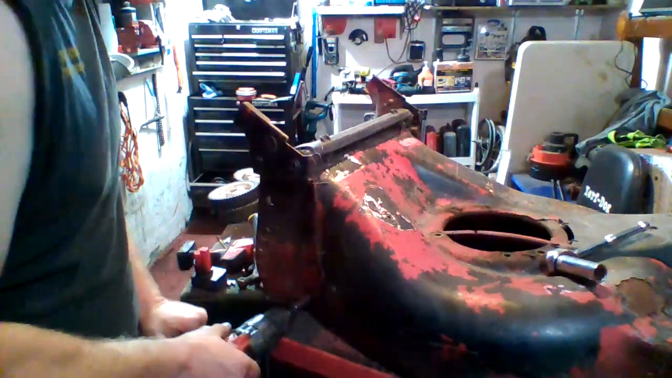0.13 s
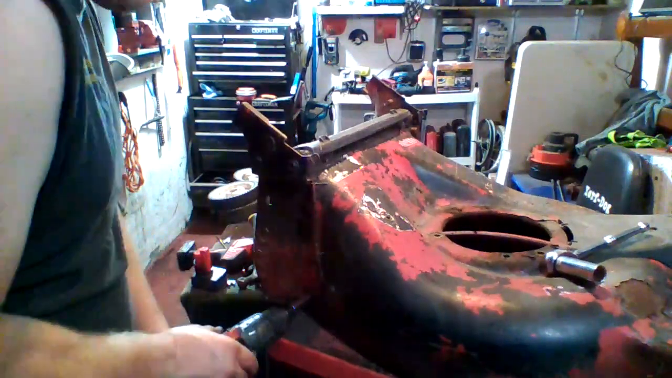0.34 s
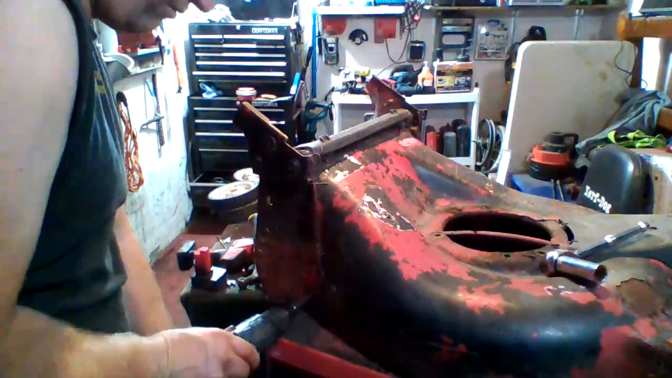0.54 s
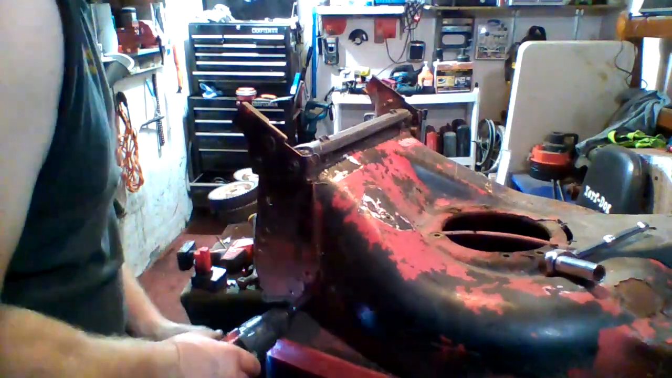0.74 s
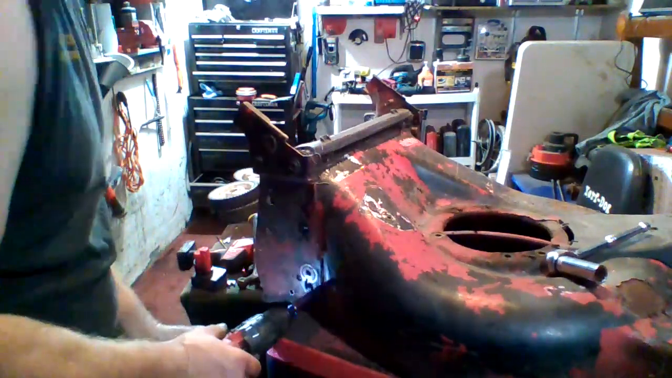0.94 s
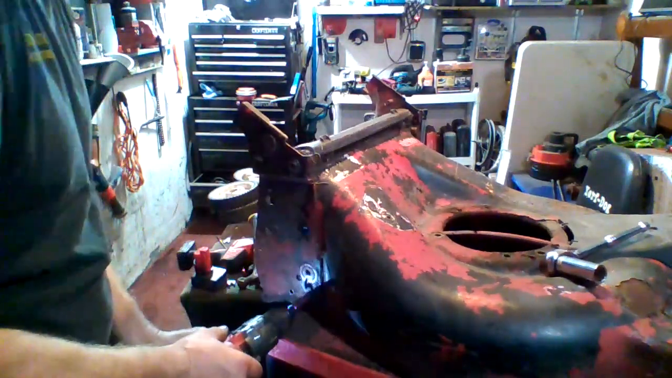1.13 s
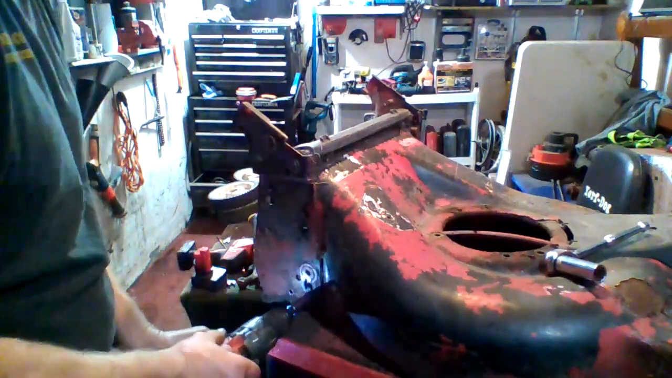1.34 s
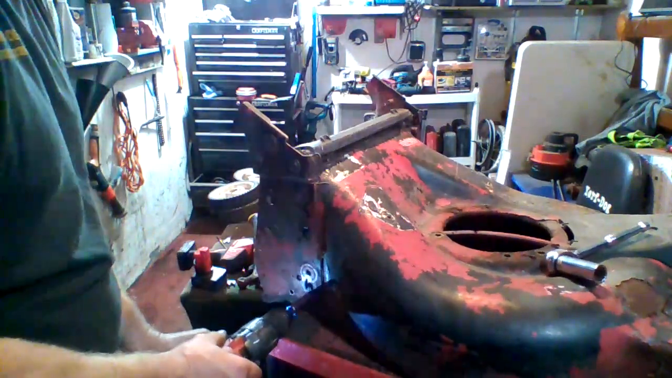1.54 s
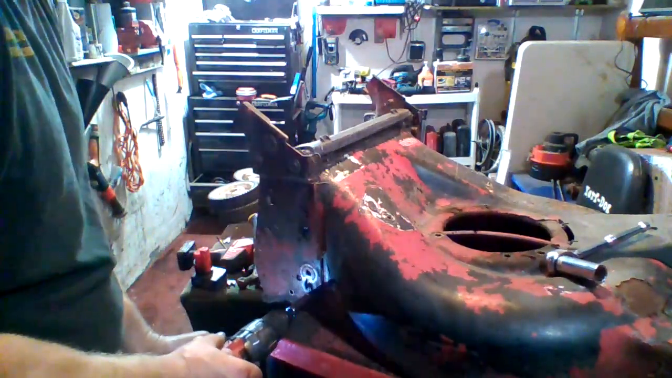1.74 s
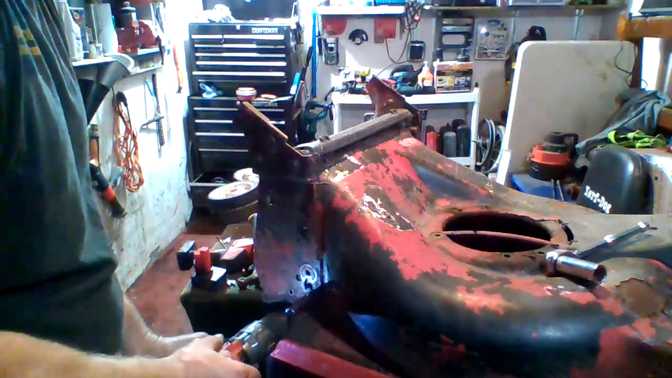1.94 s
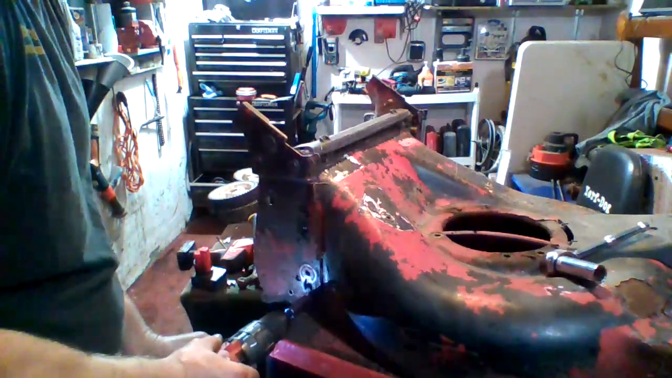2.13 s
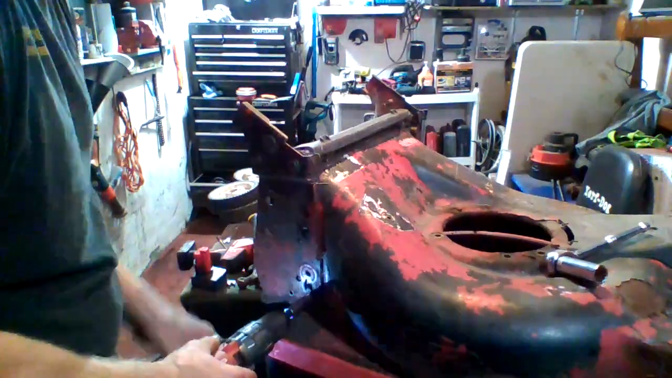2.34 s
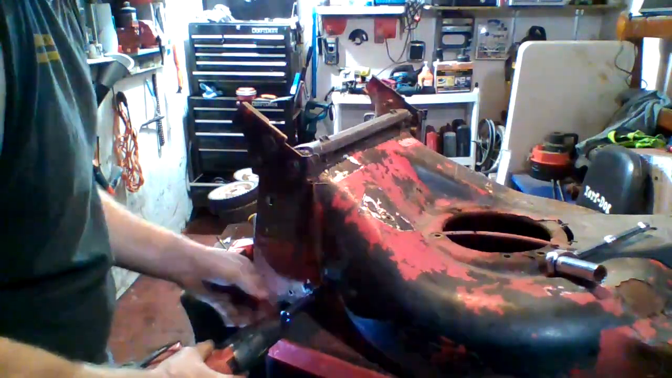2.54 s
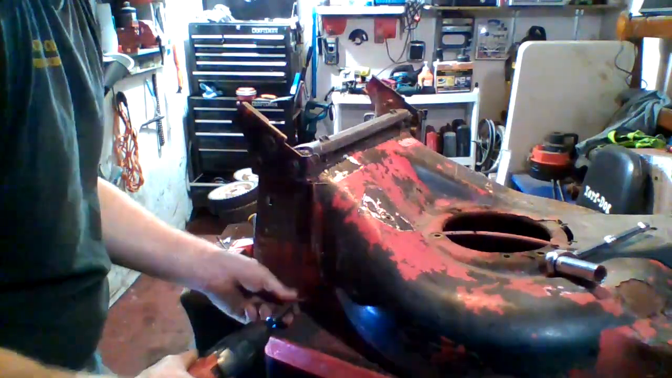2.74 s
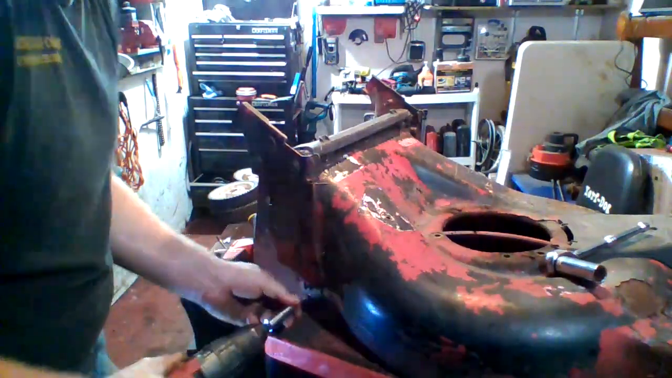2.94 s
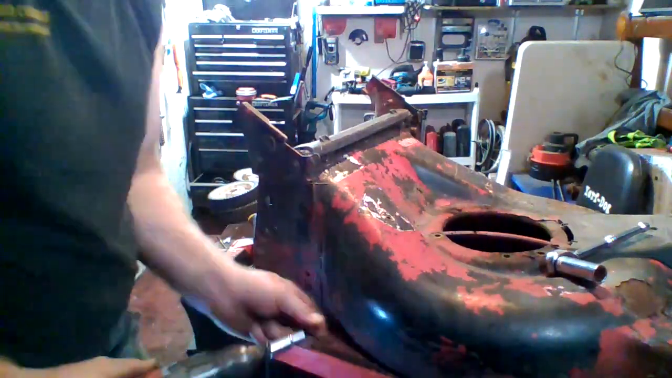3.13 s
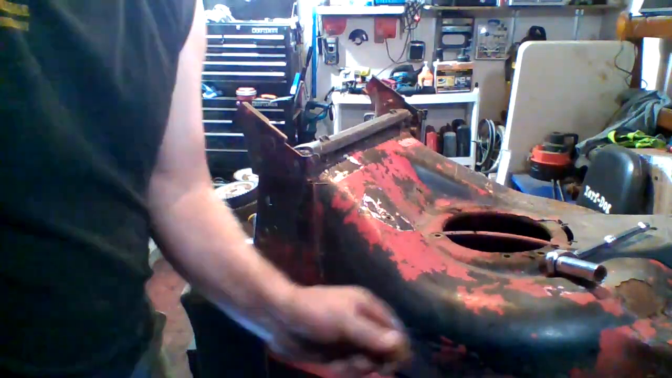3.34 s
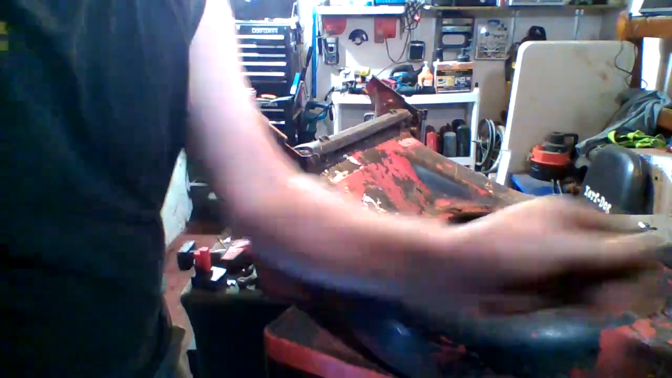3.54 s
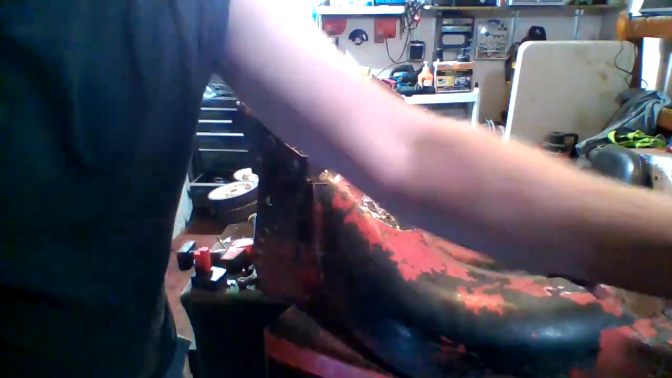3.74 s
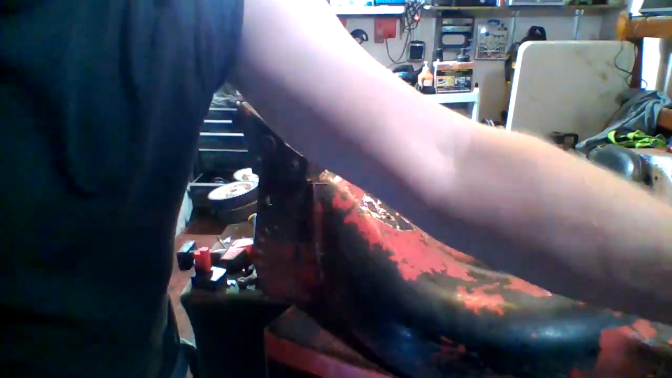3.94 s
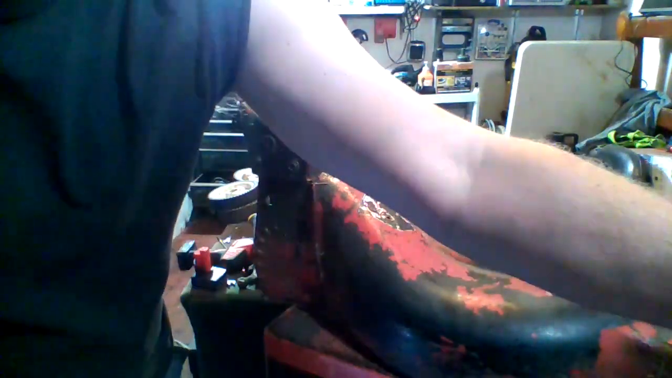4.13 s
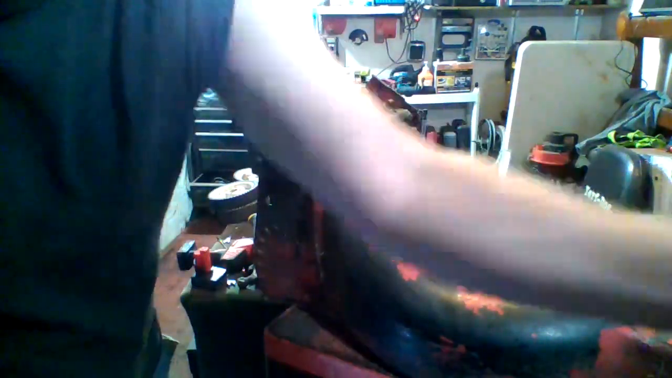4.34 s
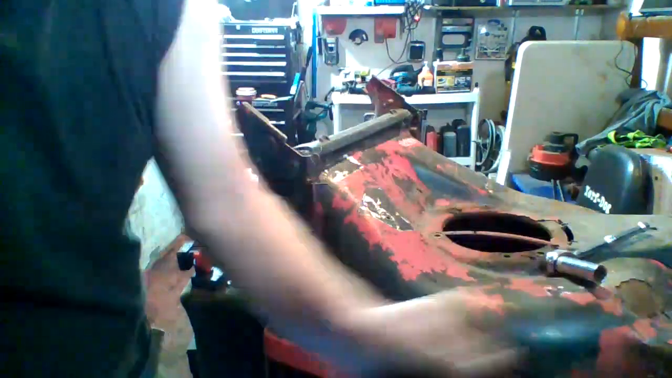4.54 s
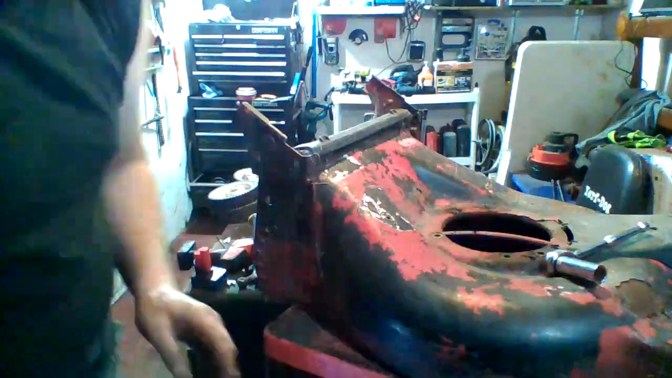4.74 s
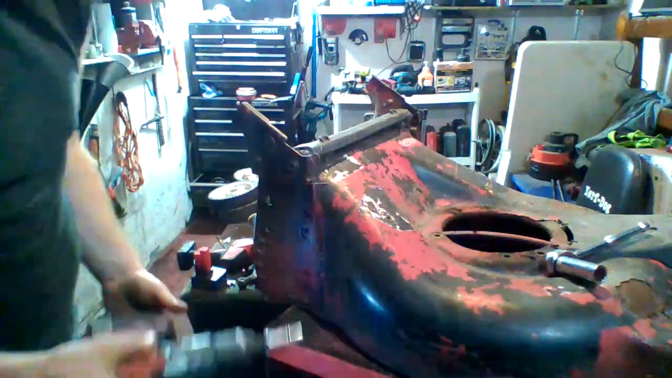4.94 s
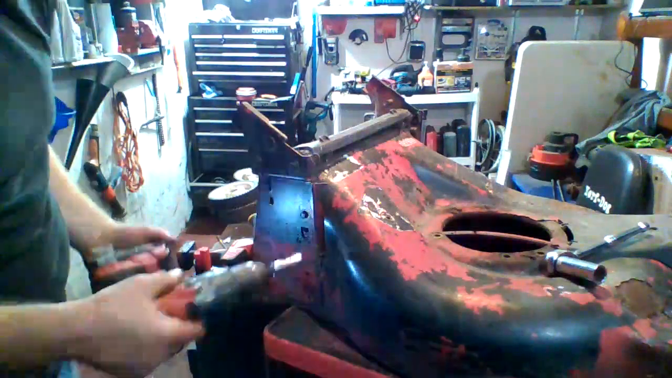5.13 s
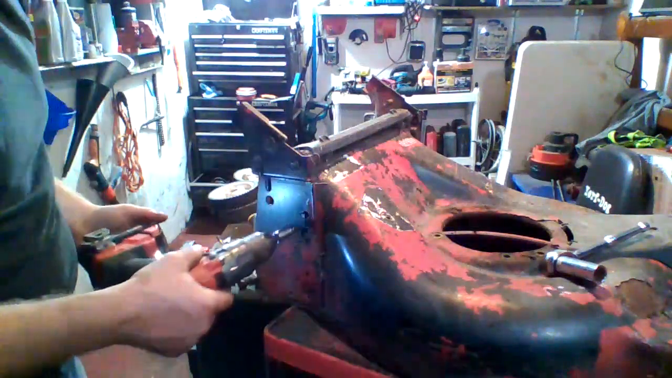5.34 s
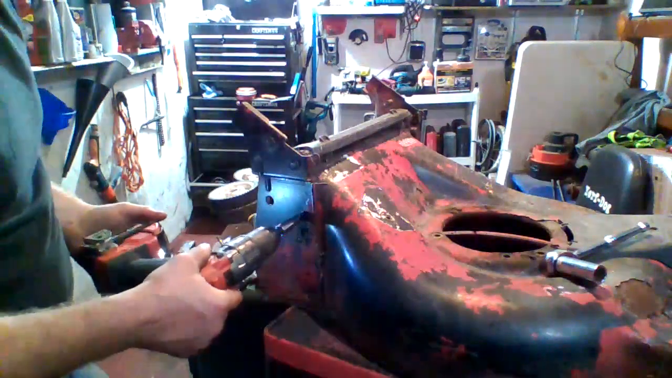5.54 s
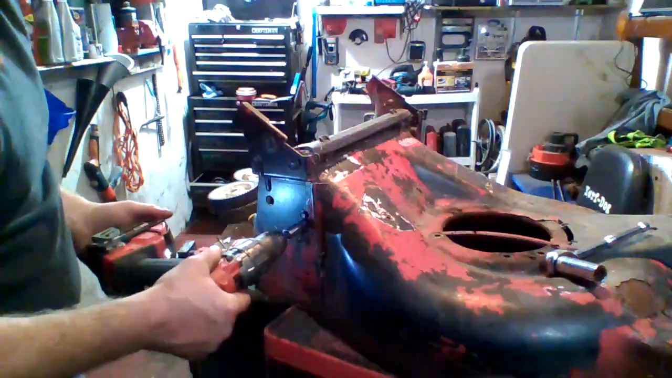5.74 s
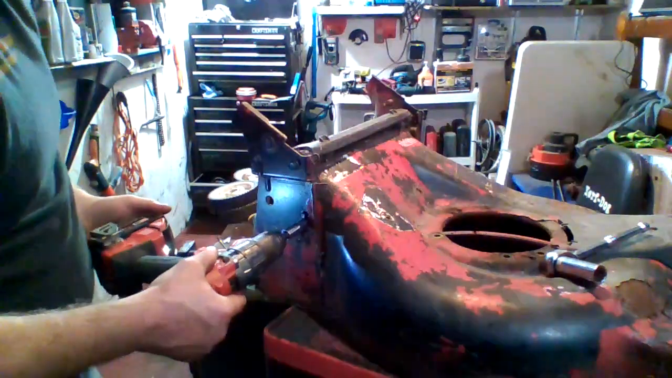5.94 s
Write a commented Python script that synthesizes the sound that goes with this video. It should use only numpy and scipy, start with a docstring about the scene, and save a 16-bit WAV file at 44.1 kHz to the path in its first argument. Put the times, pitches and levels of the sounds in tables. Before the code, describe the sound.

A nearby stereo microphone hears loose metal clicking, growing sharp, before a power driver bangs into load and whines loudly against a drumming steel deck for just over a second. The pitch leaps up, creeps higher, then plunges as the motor stops. Small taps and hand rustles follow, a bolt lands and bounces in a tray, and light handling closes with a muted knock. Short garage echoes, faint hiss and hum.

```python
"""A small garage: a cordless impact driver spins one bolt out of a steel deck near a two-port microphone.
The whine is a sum of sines at multiples of the shaft rate; gear grind and fan hiss are coloured noise, and
the deck drums in its low modes. Knocks, socket clinks and a bolt dropping into a tray are decaying modes
and noise bursts. Hands and cloth rustle in noise swells, something slides on the bench in resonant noise,
over rumble, hiss and faint tones; the tones, knocks and bench sounds leave echoes."""
import sys
import numpy as np
from scipy import signal
from scipy.fft import rfft, irfft, next_fast_len
from scipy.io import wavfile
from scipy.ndimage import uniform_filter1d

SR = 44100
rng = np.random.default_rng(int(sys.argv[2]) if len(sys.argv) > 2 else 0)


def wav_record(signal):
    """Record a signal, one row per channel, as 16-bit PCM in the file named by sys.argv[1]."""
    frames = np.transpose(np.atleast_2d(signal))
    bounded = np.clip(frames, -1, 1)
    # unit amplitude maps onto the largest positive 16-bit level
    quanta = np.round(bounded * 32767).astype(np.int16)
    wavfile.write(sys.argv[1], SR, quanta)


def decibels_to_gain(level_db):
    """Convert a level in decibels to a linear amplitude gain (20 dB per decade)."""
    exponent = np.asarray(level_db, float) / 20
    return 10 ** exponent


N = 268569
TIME = np.arange(N) / SR

# motor speed: spin-up, slow gain as the bolt frees, braking: (time [s], shaft rate [turns/s])
SHAFT_SPEED = [(1.305, 267.4), (1.33, 301.3), (1.351, 366), (1.37, 404), (1.4, 428.9), (1.44, 445.1),
               (1.555, 449.3), (1.69, 463.4), (1.8, 468.9), (1.9, 470.9), (2.1, 473), (2.345, 472.4),
               (2.375, 460.5), (2.395, 439), (2.425, 347), (2.455, 249.5)]
# strong shaft orders: (order [per turn], level at full speed [dB],
# loss per octave of speed below it [dB], change once braking [dB])
STRONG_ORDERS = [(4, -20.5, 30, 5.5), (8, -13.5, 15.5, -12), (13, -21, 37, 2), (26, -31, 13.5, 5)]
# weak steady shaft orders: (order [per turn], level at full speed [dB])
WEAK_ORDERS = [(1, -35), (32, -36)]
# pitches at which the whine arrives weakly or rings in the case, whichever order passes them:
# (frequency [Hz], half width [Hz], change [dB])
WHINE_SPOTS = [(1703, 90, -6), (1837, 21, -15), (2880, 110, 9), (3695.7, 20, -18), (5850, 45, -13),
               (6096, 17.1, -15.5)]
RELEASE_S, BRAKE_S = 2.35, 0.023  # trigger let go; time constant of the brake
WAVER, RAGGED = 0.04, 0.45  # rms phase waver of an order [rad]: always, and added away from full speed
MESH_ORDER, MESH_DB = 10.21, -37  # gear mesh [per turn] and its level at full speed without load
# speed control whistles while the trigger is half pulled, in two tones that part by PART_HZ each
WHISTLE_S, WHISTLE_END_S, WHISTLE_HZ, PART_HZ, WHISTLE_DB = 1.257, 1.3, 8150, 700, -38
# faint very high squeaks: (start [s], end [s], first pitch [Hz], last pitch [Hz], level [dB])
HIGH_SQUEAKS = [(5.345, 5.405, 13100, 13900, -56), (5.468, 5.53, 13750, 12500, -60),
                (5.91, 5.98, 15000, 13200, -62)]

# the run's noise: pull, full power, trigger release, rotor stopping, quiet
PULL_S, FULL_S, STOP_S, QUIET_S = 1.243, 1.316, 2.455, 2.539
# gear grind at those five moments, before its flicker: (level [dB], ...)
GRIND_LEVELS = -50, -20, -21, -22, -52
# fan hiss at those five moments, before its beat and flicker: (level [dB], ...)
FAN_LEVELS = -50, -14.5, -18.5, -19, -59.5
# colour of the gear grind: (frequency [Hz], relative density [dB per Hz])
GRIND_COLOUR = [(210, -53), (350, -22), (1690, -17), (1850, -20), (3430, -16), (4000, -15), (7500, -21),
                (9750, -57), (16500, -120)]
# colour of the fan hiss: (frequency [Hz], relative density [dB per Hz])
FAN_COLOUR = [(3820, -29), (6500, -7.5), (8600, -5.5), (9320, -7), (10100, -7.5), (13300, 1), (15500, -4.5)]
# colour of slack gears in their case: (frequency [Hz], relative density [dB per Hz])
CASE_COLOUR = [(1500, -26.5), (2200, 1.5), (2900, 0), (3900, 4), (4600, -18)]
# slack gears clatter as the motor takes up load
SLACK_S, SLACK_DB, SLACK_RISE_S, SLACK_FALL_S = 1.31, -20, 0.042, 0.05

# modes of the struck steel deck: (frequency [Hz], level [dB], decay time t60 [s])
DECK_MODES = [(205, -7, .12), (277, 0., .14), (325, -11, .09), (620, -9, .04), (1100, -7, .03),
              (1700, -9, .02), (2240, -6, .022)]
# drumming of the deck during the run: (time [s], level [dB])
DRUM_LEVEL = [(1.235, -64), (1.315, -23.5), (1.37, -33), (1.5, -37), (2.05, -31.5), (2.35, -34),
              (2.5, -42.5), (2.67, -61.5)]
STAND_DB = -22.5  # the stand under the deck, relative to the gear grind level
# blows on the deck: (time [s], peak level of the ringing [dB], hardness [dB per octave])
DECK_BLOWS = [(0.305, -16, 7.5), (0.535, -40, 4), (0.948, -40.5, -3.5), (1.205, -57, 17),
              (1.285, -13.5, -5.), (1.305, -12.5, -1), (5.15, -44.5, 7.5), (5.756, -27.5, -5),
              (5.8, -34, -7.5), (5.904, -41, -7)]
# rumble of the whole deck: (frequency [Hz], relative density [dB per Hz])
RUMBLE_COLOUR = [(130, -32), (260, 9.5), (420, -8), (800, -38)]
# wideband burst of a blow: (frequency [Hz], relative density [dB per Hz])
BLOW_COLOUR = [(300, -16.5), (2500, -3.0), (7000, -7.0), (15700, -8.5)]
# clinks of the loose socket on its shank: (time [s], level [dB])
SOCKET_CLINKS = [(.14, -32), (0.41, -25), (0.481, -21), (0.558, -27.5), (0.589, -10), (.626, -1),
                 (1.305, 12)]
# colour of a metal clink: (frequency [Hz], relative density [dB per Hz])
CLINK_COLOUR = [(1500, -40), (2900, -25), (3500, -11.5), (8500, -13.5), (11400, -11.5), (14000, -6),
                (15600, -7.5)]
# short pitched taps, the last three forming the body of a dull thud: (time [s], level [dB], pitch [Hz])
PITCHED_TAPS = [(2.747, -41.5, 1370), (2.805, -35.5, 1810), (2.817, -45, 1800), (3.401, -35, 1251),
                (5.079, -37.5, 1880), (5.744, -28, 1410), (5.754, -25.5, 624), (5.771, -25.5, 780)]
TAP_T60_S, TAP_WIDTH_HZ = 0.048, 380

# a bolt lands and bounces in a tray:
# (time [s], peak level of the clunk [dB], hardness [dB per octave], treble snap against the clunk [dB])
BOLT_DROPS = [(4.028, -13, -7, -9.5), (4.042, -26.5, -11, -9), (4.11, -41, -4, -13),
              (4.225, -13.5, -10.5, -16.5), (4.24, -28.5, -7, -21.5), (4.268, -35, -1.5, -23),
              (4.29, -20, -6, -34)]
# modes of the tray: (frequency [Hz], level [dB], decay time t60 [s])
TRAY_MODES = [(330, -17, .035), (450, -9, .03), (565, 0., .028), (660, -8, .025), (1090, -6, .025),
              (1350, -8, .025), (1700, -9, .028), (2230, -15, .022)]
# thin rattling panels of the tray, with a flatter colour than its modes:
# (frequency [Hz], relative density [dB per Hz])
PANEL_COLOUR = [(170, -24.5)] + [(hz, db / 2) for hz, db, _ in TRAY_MODES] + [(5000, -30.0)]
SPOT_SHIFT = 0.023  # standard deviation of the mode shift with landing spot, as a share of frequency

# faint bands of something sliding on the bench: (frequency [Hz], level [dB])
SLIDE_BANDS = [(1090, -68), (2250, -70), (3050, -74)]
SLIDE_S, SLIDE_END_S, SLIDE_WIDTH_HZ = 3.3, 4.02, 65
# hands and cloth brushing past:
# (middle [s], half length [s], rub level before its grain [dB], fine hiss level [dB])
RUSTLE_STROKES = [(0.357, 0.038, -53.5, -39.5), (0.673, 0.018, -48, -69), (0.949, 0.035, -58.5, -49.5),
                  (2.955, 0.074, -62.5, -54), (3.028, 0.042, -49, -45.5), (3.403, 0.022, -54, -55),
                  (4.663, 0.021, -54.5, -38.5), (4.731, 0.019, -70.5, -45), (5.211, 0.023, -49.5, -80.5),
                  (5.56, 0.034, -53, -49), (5.778, 0.028, -45.5, -41.5)]
# colour of the rub: (frequency [Hz], relative density [dB per Hz])
RUB_COLOUR = [(250, -10), (640, 0.5), (2300, -2), (4000, -4.5), (8000, -15.5), (12000, -36.5)]
# colour of the fine hiss: (frequency [Hz], relative density [dB per Hz])
FINE_COLOUR = [(3000, -24), (6000, -12), (11500, -7), (12800, 0.), (15600, -1.5)]

# colour of the room air: (frequency [Hz], relative density [dB per Hz])
AIR_COLOUR = [(18, 1.5), (61, -8.5), (145, -25), (330, -20.5), (560, -29.5), (1200, -32), (2200, -33),
              (5000, -37), (11500, -37), (13000, -28), (15600, -31)]
AIR_DB = -48.5
# wavering room tones: (frequency [Hz], level [dB])
ROOM_HUM = [(118, -66.5), (414, -69.5), (829, -72.5)]
# left-right likeness of the run noise, rub and echoes: (frequency [Hz], correlation [1])
NEAR_LIKENESS = [(300, 1), (1500, 0.82), (3100, 0.99), (6800, 0.17), (15000, 0.56)]
# left-right likeness set for the background and fine hiss; the top treble is nearly mono:
# (frequency [Hz], correlation [1])
BACKGROUND_LIKENESS = [(300, 0.96), (3100, 0.38), (15000, .94)]
# phase by which the left port leads: (frequency [Hz], lead [rad])
PORT_LEAD = [(600, 0.025), (2700, 0.73), (3880, 1.59), (5200, 1.293), (7000, 0.58), (13000, 0.27)]
# left port minus right port: (frequency [Hz], level difference [dB])
PORT_TILT = [(700, 0), (3770, 1), (15000, 2.5)]
# reverberation of the garage: (frequency [Hz], decay time t60 [s])
GARAGE_DECAY = [(150, .25), (700, .11), (4000, .14), (15000, .12)]


def evened(x):
    """Normalisation: scales to rms 1."""
    return x / np.sqrt(np.mean(x ** 2) + 1e-20)


def read(points, hz):
    """Interpolation of a spectrum table on a log-frequency axis."""
    f, value = np.transpose(points)
    return np.interp(np.log(hz + 1), np.log(f + 1), value)


def curves(rows):
    """Linear interpolation of table columns in time, with a gate open while the table lasts."""
    s, *columns = np.transpose(rows)
    gate = np.interp(TIME, [s[0] - .01, s[0], s[-1], s[-1] + .01], [0, 1, 1, 0])
    return gate, *(np.interp(TIME, s, c) for c in columns)


def drift(size, passes=1):
    """Random fluctuation: white noise low-passed by moving averages, rms 1."""
    x = rng.standard_normal(N)
    for _ in range(passes):
        x = uniform_filter1d(x, size=size)
    return evened(x)


def add(mix, s, sound):
    """Superposition: adds a sound to the mix at time s."""
    part = mix[round(s * SR):][:len(sound)]
    part += sound[:len(part)]


def ports(hz):
    """Stereo cues: phase and level difference between the two microphone ports."""
    half = decibels_to_gain(read(PORT_TILT, hz) / 2) * np.exp(.5j * read(PORT_LEAD, hz))
    return np.array([half, 1 / half])


def noise(colour, likeness, patchy_db):
    """Partially coherent stereo noise, shaped in frequency with drifting patches, rms 1."""
    frames, hz = N // 256 + 5, np.fft.rfftfreq(1024, 1 / SR)
    a, b, c, d, patches = rng.standard_normal((frames, 513, 5)).T
    patches = uniform_filter1d(patches, size=12, axis=0)
    patches = evened(uniform_filter1d(patches, size=8, axis=1))
    same = np.clip(read(likeness, hz), -1, 1)[:, None]
    left = a + 1j * b
    right = same * left + np.sqrt(1 - same ** 2) * (c + 1j * d)
    z = np.array([left, right]) * ports(hz)[:, :, None]
    z *= decibels_to_gain(read(colour, hz)[:, None] + patchy_db * patches)
    return evened(signal.istft(z, nperseg=1024, noverlap=768)[1][:, :N])


def resonate(x, hz, width):
    """Resonance of gain 1 by heterodyning: shift to zero frequency, low-pass, shift back."""
    turn = np.exp(2j * np.pi * np.cumsum(hz * np.ones(N)) / SR)
    r = np.exp(-np.pi * width / SR)
    return 2 * (turn * signal.lfilter([1 - r], [1, -r], x / turn)).real


def ring(modes, tilt_db=0, spot=0):
    """Modal decay: damped sines of random sign, peak 1; a harder blow lifts the high modes."""
    t, signs = TIME[:SR // 2], rng.choice([-1, 1], len(modes))
    shifts = 1 + spot * rng.standard_normal(len(modes))
    out = np.zeros(len(t))
    for sign, shift, (hz, db, t60) in zip(signs, shifts, modes):
        envelope = decibels_to_gain(db + tilt_db * np.log2(hz / 1000) - 60 * t / t60)
        out += sign * envelope * np.sin(2 * np.pi * hz * shift * t)
    return out / abs(out).max()


def crack(colour, t60):
    """Transient: coloured noise of rms 0.5 under an exponential decay and a short linear attack."""
    t = TIME[:SR // 2]
    spectrum = rfft(rng.standard_normal(len(t))) * decibels_to_gain(read(colour, np.fft.rfftfreq(len(t), 1 / SR)))
    burst = evened(irfft(spectrum)) / 2
    return burst * decibels_to_gain(-60 * t / max(t60, .005)) * np.minimum(t / 0.00044, 1)


def garage(x, wet_db):
    """Reverberation: direct sound through the ports plus sparse random echoes, decaying band by band."""
    size = next_fast_len(N + 4096)
    direct = irfft(rfft(x, size) * ports(np.fft.rfftfreq(size, 1 / SR)), size)[:, :N]
    taps = np.zeros((2, SR // 2))
    slots = np.arange(200, SR // 2 - 20, 20)  # one echo falls somewhere in each slot of 20 samples
    at = slots + rng.integers(0, 20, (2, len(slots)))
    np.put_along_axis(taps, at, rng.choice([-1., 1.], at.shape), 1)
    hz, t, z = signal.stft(taps, SR, nperseg=256)
    same = np.clip(read(NEAR_LIKENESS, hz), -1, 1)[:, None]  # low echoes reach both ports alike
    z[1] = same * z[0] + np.sqrt(1 - same ** 2) * z[1]
    decay = decibels_to_gain(-60 * t / read(GARAGE_DECAY, hz)[:, None])
    tail = signal.istft(z * decay, SR, nperseg=256)[1]
    tail = tail / np.linalg.norm(tail[0])
    return direct + decibels_to_gain(wet_db) * signal.fftconvolve(x[None], tail, axes=1)[:, :N]


def shaft_motion():
    """Rotation: the gate of the run, the shaft rate [Hz] and its integral, the shaft angle [rad]."""
    gate, shaft_hz = curves(SHAFT_SPEED)
    return gate, shaft_hz, 2 * np.pi * np.cumsum(shaft_hz) / SR


def motor_whine():
    """Order excitation: poles, slots, fan blades and gear mesh sound at multiples of the shaft rate."""
    gate, shaft_hz, angle = shaft_motion()
    speed = shaft_hz / shaft_hz.max()
    braking = 1 - np.exp(-np.maximum(TIME - RELEASE_S, 0) / BRAKE_S)
    loose = WAVER + RAGGED * np.tanh(8 * (1 - speed))
    out = np.zeros(N)
    for order, db, slope_db, brake_db in STRONG_ORDERS:
        waver_db = 6 * loose * drift(400, passes=2)
        slip = loose * drift(400, passes=2)
        spot_db = sum(by_db * np.exp(-.5 * ((order * shaft_hz - hz) / half) ** 2)
                      for hz, half, by_db in WHINE_SPOTS)
        level_db = db + slope_db * np.log2(speed) + spot_db + brake_db * braking + waver_db
        out += decibels_to_gain(level_db) * np.sin(order * angle + slip)
    out += speed ** 3 * sum(decibels_to_gain(db) * np.sin(order * angle) for order, db in WEAK_ORDERS)
    reached = np.maximum.accumulate(speed)
    load_db = 9 * np.tanh(40 * (1 - reached))  # the gears sing louder while the bolt still drags
    out += speed ** 4 * decibels_to_gain(MESH_DB + load_db) * np.sin(MESH_ORDER * angle)
    return gate * np.sqrt(2) * out  # a sine of level 0 dB has rms 1


def whistle_and_squeaks():
    """Narrow-band filtering: noise through gliding resonances gives the trigger whistle and squeaks."""
    whistle = [(WHISTLE_S, WHISTLE_END_S, WHISTLE_HZ, WHISTLE_HZ + way * PART_HZ, WHISTLE_DB)
               for way in (-1, 1)]
    out = np.zeros(N)
    for start, end, from_hz, to_hz, db in whistle + HIGH_SQUEAKS:
        gate, hz = curves([(start, from_hz), (end, to_hz)])
        band = resonate(resonate(rng.standard_normal(N), hz, 120), hz, 120)
        out += gate * decibels_to_gain(db) * evened(band)
    return out


def run_levels():
    """Source strength: the gate of the run and the grind and fan levels [dB] over time."""
    moments = PULL_S, FULL_S, RELEASE_S, STOP_S, QUIET_S
    return curves(np.transpose([moments, GRIND_LEVELS, FAN_LEVELS]))


def grind_and_fan():
    """Amplitude modulation: gear grind and fan hiss flicker together; the hiss beats once per turn."""
    gate, grind_db, fan_db = run_levels()
    beat = 1 + .3 * np.cos(shaft_motion()[2])
    flicker = decibels_to_gain(1.6 * drift(250))  # random flicker shared by grind and fan hiss
    grind = decibels_to_gain(grind_db) * flicker * noise(GRIND_COLOUR, NEAR_LIKENESS, patchy_db=1.5)
    fan = decibels_to_gain(fan_db) * beat * flicker * noise(FAN_COLOUR, NEAR_LIKENESS, patchy_db=3)
    return gate * (grind + fan)


def slack_gears():
    """Backlash: slack gears clatter in the case as one flat-topped swell of noise."""
    late = (TIME - SLACK_S) / np.where(TIME < SLACK_S, SLACK_RISE_S, SLACK_FALL_S)
    return decibels_to_gain(SLACK_DB) * np.exp(-late ** 4) * noise(CASE_COLOUR, NEAR_LIKENESS, patchy_db=-4.0)


def deck_drumming():
    """Forced vibration: one random shake drives the low deck modes and the stand under the deck."""
    shaking, drum_db = curves(DRUM_LEVEL)
    gate, grind_db, _ = run_levels()
    shake = rng.standard_normal(N)
    drum = sum(decibels_to_gain(db) * resonate(shake, hz, 3 / t60) for hz, db, t60 in DECK_MODES[:3])
    stand = evened(resonate(resonate(shake, 49.0, 26), 58, 26))
    return shaking * decibels_to_gain(drum_db) * evened(drum) + gate * decibels_to_gain(grind_db + STAND_DB) * stand


def deck_blows():
    """Impact excitation: a scraping contact drives the deck modes, with a rumble and a wideband burst."""
    out = np.zeros(N)
    build_up = np.minimum(TIME[:SR // 2] / 0.02, 1)
    for s, db, hard_db in DECK_BLOWS:
        contact = round(SR * .002 * decibels_to_gain(-3.5 * hard_db)) + 3  # soft pushes scrape on for longer
        scrape = rng.standard_normal(SR // 10)[:contact] * np.hanning(contact)
        body = signal.fftconvolve(ring(DECK_MODES, hard_db, SPOT_SHIFT), scrape)[:SR // 2]
        rumble = decibels_to_gain(-7.5 - 1.5 * hard_db) * build_up * crack(RUMBLE_COLOUR, 0.21)
        burst = decibels_to_gain(-11.0 + 2 * hard_db) * crack(BLOW_COLOUR, 0.044)
        add(out, s, decibels_to_gain(db) * (body / abs(body).max() + rumble + burst))
    return out


def socket_clinks():
    """Double decay: a brief metallic snap over a weaker, longer tail of the same colour."""
    out = np.zeros(N)
    for s, db in SOCKET_CLINKS:
        snap = crack(CLINK_COLOUR, .01)
        tail = decibels_to_gain(-16) * crack(CLINK_COLOUR, .12)
        add(out, s, decibels_to_gain(db) * (snap + tail))
    return out


def pitched_taps():
    """Damped resonance: short noise bursts, each peaked about one pitch."""
    out = np.zeros(N)
    for s, db, hz in PITCHED_TAPS:
        peak = [(hz / 4, -30), (hz - TAP_WIDTH_HZ, -9), (hz, 0), (hz + TAP_WIDTH_HZ, -9), (hz * 4, -24)]
        add(out, s, decibels_to_gain(db) * crack(peak, TAP_T60_S))
    return out


def bolt_drops():
    """Modal impact: the bolt clunks in the tray, a little differently at each landing spot."""
    out = np.zeros(N)
    soft = np.minimum(TIME[:SR // 2] / .002, 1)  # the tray gives way under the bolt
    for s, db, hard_db, snap_db in BOLT_DROPS:
        modes = ring(TRAY_MODES, hard_db, SPOT_SHIFT)
        clunk = soft * (modes + decibels_to_gain(-11) * crack(PANEL_COLOUR, .075))
        snap = crack(CLINK_COLOUR, 0.015) + decibels_to_gain(-1) * crack(FINE_COLOUR, 0.0535)
        add(out, s, decibels_to_gain(db) * (clunk / abs(clunk).max() + decibels_to_gain(snap_db) * snap))
    return out


def sliding():
    """Friction noise in fixed resonances, fading in over a tenth of a second."""
    swell = np.clip((TIME - SLIDE_S) * 10, 0, 1) * (TIME < SLIDE_END_S)
    return swell * sum(decibels_to_gain(db) * evened(resonate(rng.standard_normal(N), hz, SLIDE_WIDTH_HZ))
                       for hz, db in SLIDE_BANDS)


def rustle():
    """Friction of cloth or skin: each stroke swells and fades as a grainy rub and a fine hiss."""
    grain = decibels_to_gain(2.0 * drift(200))
    strokes = np.array([np.exp(-.5 * ((TIME - s) / half) ** 2) for s, half, _, _ in RUSTLE_STROKES])
    rub, fine = decibels_to_gain(np.transpose(RUSTLE_STROKES)[2:]) @ strokes
    rubbing = rub * grain * noise(RUB_COLOUR, NEAR_LIKENESS, patchy_db=2.5)
    return rubbing + fine * noise(FINE_COLOUR, BACKGROUND_LIKENESS, patchy_db=1.0)


def room_tone():
    """Background noise: rumble and hiss, with tones that waver as very narrow bands of noise do."""
    hum = sum(decibels_to_gain(db) * evened(resonate(rng.standard_normal(N), hz, 4.9)) for hz, db in ROOM_HUM)
    return decibels_to_gain(AIR_DB) * noise(AIR_COLOUR, BACKGROUND_LIKENESS, patchy_db=2) + hum


def scene():
    """Superposition: tones, deck drumming, hits and bench sounds get echoes; the noise layers stay dry."""
    tones = garage(motor_whine() + whistle_and_squeaks(), wet_db=-20)
    run = grind_and_fan() + slack_gears() + garage(deck_drumming(), wet_db=-26)
    hits = garage(deck_blows() + socket_clinks() + pitched_taps(), wet_db=-11.0)
    bench = garage(bolt_drops() + sliding(), wet_db=-11.5)
    return tones + run + hits + bench + rustle() + room_tone()


def band_limit(x):
    """A steep low-pass at the top of the band."""
    return signal.sosfilt(signal.butter(12, 15670, fs=SR, output="sos"), x)


def record(dry):
    """Saturation: the converter clips at full scale."""
    mix = np.clip(dry, -1, 1)
    return band_limit(mix)


dry = scene()
out = record(dry)
wav_record(out)
```